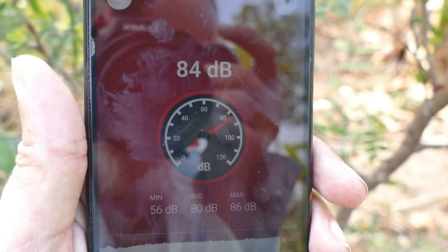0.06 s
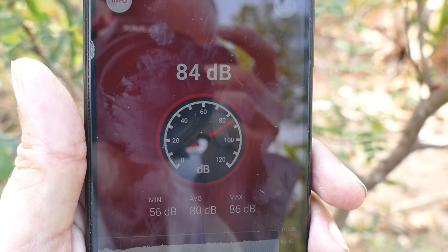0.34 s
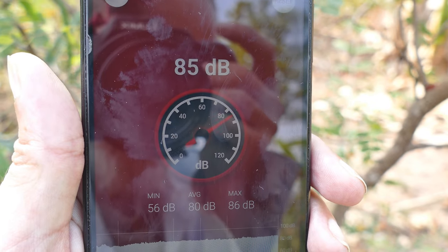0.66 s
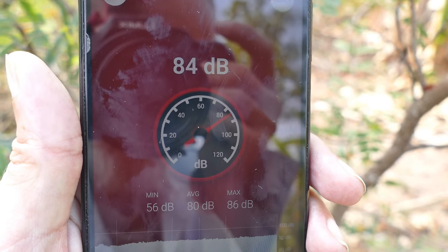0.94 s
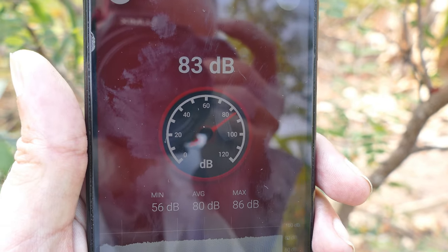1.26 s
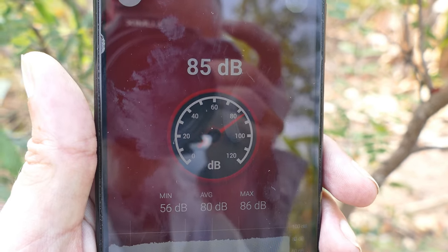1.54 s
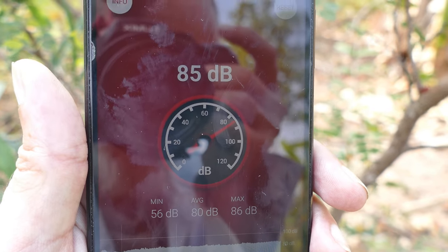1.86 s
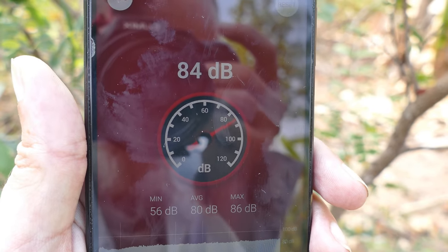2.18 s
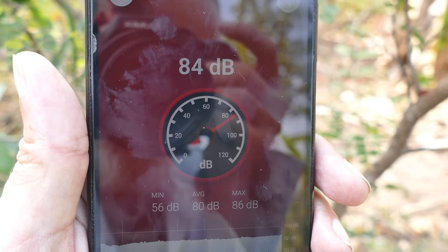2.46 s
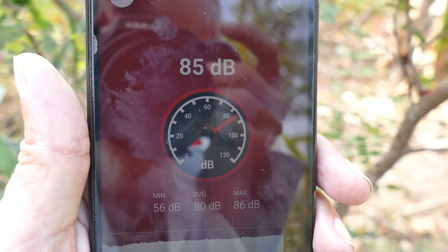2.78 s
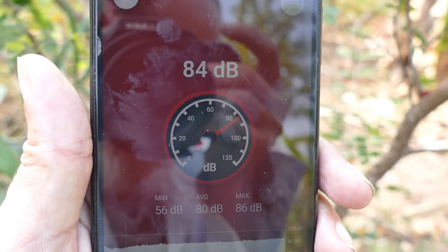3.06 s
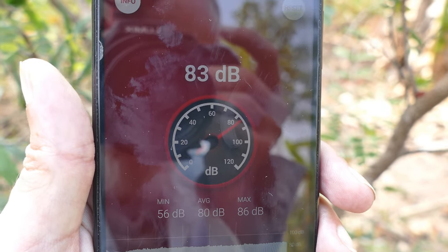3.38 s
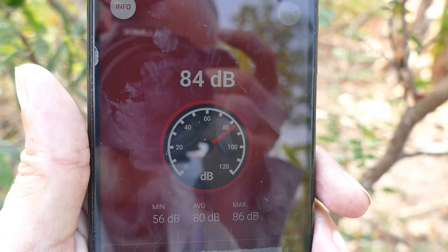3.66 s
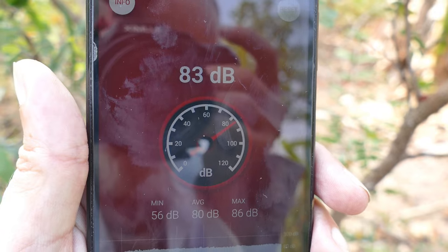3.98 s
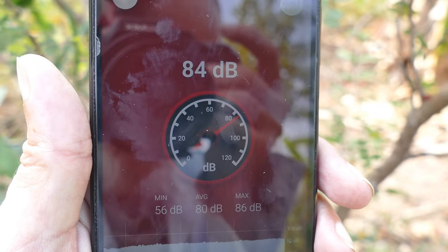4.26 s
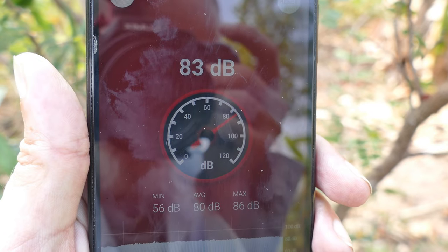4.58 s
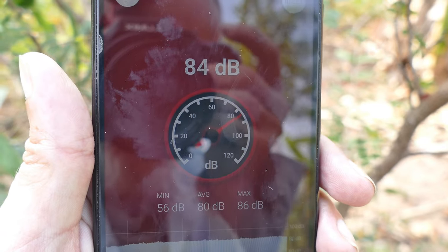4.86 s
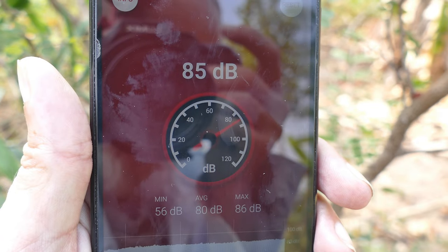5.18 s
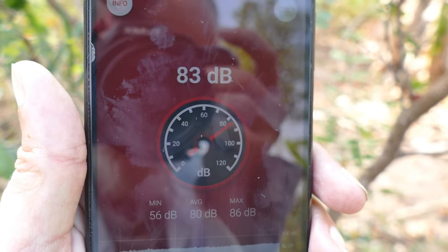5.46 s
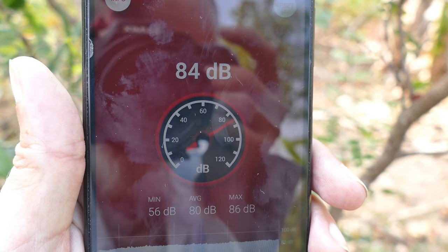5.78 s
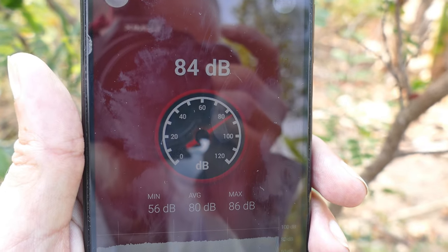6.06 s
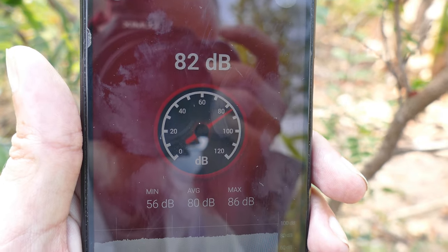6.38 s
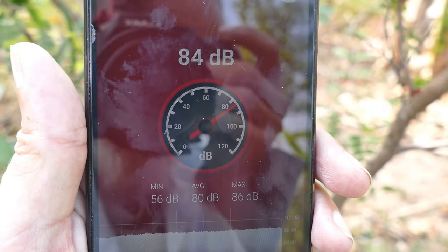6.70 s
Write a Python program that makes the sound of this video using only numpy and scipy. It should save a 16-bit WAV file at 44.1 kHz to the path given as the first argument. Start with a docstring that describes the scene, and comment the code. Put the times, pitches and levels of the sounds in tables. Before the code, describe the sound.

A loud nearby cicada rasps rhythmically, then settles into a steady fluttering buzz over a shimmering distant chorus.

```python
"""A near cicada sings a loud, reedy tone, bent by its tymbal clicks and chopped by its belly about 39
times a second. At first it keeps breaking into short bright rasps, then it settles into a steady flutter.
A second cicada pulses high and thin and fades. Behind them: a shimmering far chorus, a little wind on
the microphone and a faint noise floor."""
import sys
import numpy as np
from scipy import signal
from scipy.fft import rfft, irfft
from scipy.io import wavfile
from scipy.ndimage import uniform_filter1d

SR = 44100
rng = np.random.default_rng(int(sys.argv[2]) if len(sys.argv) > 2 else 0)


def wrap_up_sound(samples):
    """Save the sound to the file named by the first command line argument, as 16-bit audio."""
    columns = np.atleast_2d(samples).T
    # keep every value between -1 and 1, then stretch to whole-number steps
    tamed = np.clip(columns, -1, 1)
    steps = np.round(tamed * 32767).astype(np.int16)
    wavfile.write(sys.argv[1], SR, steps)


N = 305613
TIME_S = np.arange(N) / SR


# song partials: (harmonic number, relative level [dB], loss in a rasp [dB])
SONG_PARTIALS = [(1, -13.5, 4), (2, 2, 10.5), (3, -5.5, 3), (4, -17.5, -6.5), (5, -42, 3)]
# echoes off nearby surfaces: (delay [ms], gain [dB])
SONG_REFLECTIONS = [(1.173, -20.5), (5.801, -16)]
# response of hollow belly and wings: (frequency [Hz], relative gain [dB])
BELLY_RESPONSE = [(1100, -7), (1400, 2), (1730, -2), (2250, 0), (2650, 2), (2900, 0), (3250, 2.5),
                  (3700, 3), (4000, 4), (4280, 3), (4560, 0), (5150, 4), (5550, -1.5), (5880, 6),
                  (6200, 4.5), (7000, -4.5), (10000, -26)]

def song(slack, pitch_hz=1725.8, db=-17, glide=.2, choke_lift=.05, sag_db=11, choke_db=12):
    """The belly rings like a reed; each click drops the pitch, which climbs back, higher when choked."""
    choked = flutter()
    cycle = tymbal(click_hz=213.8, jitter=.17)
    tension = uniform_filter1d(cycle, size=24)
    bend = glide * (tension - .5) + choke_lift * choked
    wobble = .01459 * walk(700) + .018 * walk(107.3) + .00398 * walk(10.99)
    phase = 2 * np.pi * np.cumsum(pitch_hz * (1 + bend + wobble)) / SR
    tone = sum(np.sin(harmonic * phase) * undb(partial_db - loss_db * slack + .49 * walk(600))
               for harmonic, partial_db, loss_db in SONG_PARTIALS)
    # each rib snap collapses the ring by a random depth
    collapse = uniform_filter1d(np.exp(-cycle / .089), size=16) * np.abs(walk(280))
    tone = tone * undb(-sag_db * collapse - choke_db * choked + .67 * walk(230))
    # the gliding pitch beats against its echoes
    tone = tone + sum(undb(echo_db) * delay(tone, ms) for ms, echo_db in SONG_REFLECTIONS)
    # upper resonance, strong while the belly is taut
    wing = level(ring(tone, hz=4286, width_hz=330), db=-14) * undb(-14 * slack)
    return (colour(tone, BELLY_RESPONSE) + wing) * undb(db)


def flutter(beat_hz=39.184, slowing_hz_per_s=.4, settle_s=2.59, close_beats=.08, reopen_beats=.15):
    """The belly chokes the song (0-1) at each beat's end, in random stumbles and after each rasp."""
    since_s = TIME_S - settle_s
    beats = beat_hz * since_s - slowing_hz_per_s * since_s ** 2 / 2 + .035 * walk(20)
    cycle = beats % 1
    gap_beats = .05 + .115 * np.sqrt(np.maximum(since_s, 0))
    gap_beats *= np.exp(.25 * rng.standard_normal(size=400)[np.floor(beats).astype(int)])  # per beat
    closing = (cycle - 1 + gap_beats) / close_beats + .9
    reopening = (1 - cycle) / reopen_beats
    gap = np.clip(np.minimum(closing, reopening), 0, 1)
    stumble = np.clip(2 * (walk(169) - 2.1), 0, 1)
    pause = sum(gain * bump(time_s + .02164, width_s=.005) for time_s, gain, _ in rasp_events())
    return uniform_filter1d(np.minimum(gap + stumble + pause, 1), size=24)


def tymbal(click_hz, jitter):
    """Ribs buckle in quick, uneven succession: position in the click cycle (0-1)."""
    return np.cumsum(click_hz * (1 + jitter * walk(80) + .015 * walk(1.8))) / SR % 1


# rasp spectrum: (frequency [Hz], relative level [dB])
RASP_SPECTRUM = [(1200, -36), (2000, -13.5), (2500, -22.5), (3300, 5), (4200, -11), (5200, 5.5),
                 (6000, -19), (6800, -5.5), (7600, -14.5), (8300, -7.5), (9400, -21.5), (11000, -19),
                 (14500, -15.5), (15600, -24)]

def rasp(envelope, db=-21, decay_cycles=.94):
    """With the belly slack the ribs snap faster and drier: one bright burst per click."""
    bursts = noise() * np.exp(-tymbal(click_hz=280.6, jitter=.055) / decay_cycles)
    return colour(bursts, RASP_SPECTRUM) * envelope * undb(db)


# rasping bouts: (start [s], end [s], rasp width at full vigour [s])
RASP_BOUTS = [(-.707, .866, .033), (1, 2.787, .041)]

def rasp_events(stride_s=.1638, warm_up_s=.5317, wind_down_s=.2402, tire_s=.14):
    """A bout starts eagerly, finds its stride, hurries and tires: (time [s], gain, width [s])."""
    events = []
    for start_s, end_s, width_s in RASP_BOUTS:
        time_s = start_s
        while time_s < end_s:
            vigour = 1 - np.exp((time_s - end_s) / tire_s)
            events.append((time_s, vigour, width_s * np.sqrt(vigour)))
            eager_s = .0374 * np.exp((start_s - time_s) / warm_up_s)
            hurry_s = .086 * np.exp((time_s - end_s) / wind_down_s)
            time_s += max(stride_s - eager_s - hurry_s, stride_s / 2)
    return events


# high cicada spectrum: (frequency [Hz], relative level [dB])
HIGH_SPECTRUM = [(4000, -40), (6500, 3.5), (9500, -9.5), (10800, 0), (11400, -10), (12000, 1), (13000, 2.5),
                 (13500, -4), (14300, -4.5), (15500, -13)]

def high_cicada(trim_db=-1, swell_s=.0528, push_s=.0275, push_lag_s=.034, push_db=-7):
    """A thin tymbal sizzle swells 6-8 times a second, each swell with a softer after-push."""
    envelope = sum(undb(db) * (bump(time_s, swell_s) + undb(push_db) * bump(time_s + push_lag_s, push_s))
                   for time_s, db in swell_events())
    sizzle = noise() * np.exp(-tymbal(click_hz=293, jitter=.055))
    return colour(sizzle, HIGH_SPECTRUM) * envelope * undb(trim_db)


# high cicada effort: (time [s], swell spacing [s], relative level [dB])
SWELL_EFFORT = [(.4, .1666, -35.5), (1, 0.13, -36), (1.2, 0.1395, -31.5), (1.5, 0.1496, -33.5),
                (3.45, 0.1684, -35), (4.35, .1276, -38), (4.55, 0.13, -47)]

def swell_events(first_s=.041):
    """Effort paces the swells, up to its last point: (time [s], relative level [dB])."""
    times_s, spacings_s, levels_db = np.transpose(SWELL_EFFORT)
    events, time_s = [], first_s
    while time_s < times_s[-1]:
        events.append((time_s, np.interp(time_s, times_s, levels_db)))
        time_s += np.interp(time_s, times_s, spacings_s)
    return events


# far chorus spectrum: (frequency [Hz], relative level [dB])
CHORUS_SPECTRUM = [(1150, -32), (1400, -10), (1720, 1.5), (2250, -12.5), (2900, -4), (3450, -23),
                   (4500, -0.5), (5200, -20), (6300, -11.5), (7000, -9), (8200, -14.5), (9500, -16.5),
                   (12800, -16), (15500, -29.5)]

def chorus(db=-35.5, grain_db=2, shimmer_db=.59):
    """Many distant cicadas melt into a shimmering hiss."""
    hiss = noise() * undb(grain_db * walk(280) + shimmer_db * walk(30))
    return colour(hiss, CHORUS_SPECTRUM) * undb(db)


# gusts: (time [s], level [dB], width [s])
WIND_GUSTS = [(.8, -30.5, 0.21), (1.1, -43.5, 0.38), (6.6, -41.5, 0.77)]
# wind spectrum: (frequency [Hz], relative level [dB])
WIND_SPECTRUM = [(7, 14), (11, 17), (17, 8.5), (25, 4), (40, -8), (62, -13), (100, -23), (150, -35),
                 (300, -54)]

def wind(breeze_db=-42.5, waver_db=2):
    """A wavering breeze and a few gusts buffet the microphone."""
    breeze = undb(breeze_db + waver_db * walk(2.4))
    gusts = sum(undb(db) * bump(time_s, width_s) for time_s, db, width_s in WIND_GUSTS)
    return colour(noise(), WIND_SPECTRUM) * (breeze + gusts)


# stereo hiss spectrum: (frequency [Hz], relative level [dB])
STEREO_HISS_SPECTRUM = [(680, -69), (1150, -42), (1350, -16), (1680, -2), (2120, -14.5), (3520, 1),
                        (5230, -1), (9350, -20.5), (12500, -18), (15000, -29)]

def stereo_hiss(db=-44):
    """A faint steady high hiss, heard as width."""
    return undb(db) * colour(noise(), STEREO_HISS_SPECTRUM)


# noise floor spectrum: (frequency [Hz], relative level [dB])
FLOOR_SPECTRUM = [(100, -4), (200, 3.5), (350, 0.5), (650, -0.5), (900, 1.5), (1150, 2.5)]

def noise_floor(slack, db=-61.5, flicker_db=2.2, dip_db=4):
    """A faint, flickering low noise floor that dips under each rasp."""
    return colour(noise() * undb(flicker_db * walk(40)), FLOOR_SPECTRUM) * undb(db - dip_db * slack)


def scatter(x, t60_s):
    """Many weak reflections off twigs and trunks."""
    tail = noise()[:SR // 2] * undb(-60 * TIME_S[:SR // 2] / t60_s)
    return signal.fftconvolve(x, tail / np.linalg.norm(tail))[:N]


def undb(db):
    """Decibels to gain."""
    return 10 ** (np.asarray(db) / 20)


def level(x, db=0):
    """Scale to an rms level."""
    return x * undb(db) / np.sqrt(np.mean(x ** 2))


def noise():
    """White noise."""
    return rng.standard_normal(N)


def walk(rate_hz):
    """Smooth random drift, rms 1."""
    lowpass = np.exp(-(np.fft.rfftfreq(N, 1 / SR) / rate_hz) ** 2)
    return level(irfft(rfft(noise()) * lowpass, N))


def colour(x, spectrum):
    """Filter by a spectrum, falling 20 dB/octave past its ends; output rms 1."""
    hz, db = np.transpose(spectrum)
    octave, knots = np.log2(np.fft.rfftfreq(N, 1 / SR) + 1), np.log2(hz)
    octaves_outside = np.abs(octave - np.clip(octave, knots[0], knots[-1]))
    gain = undb(np.interp(octave, knots, db) - 20 * octaves_outside)
    return level(irfft(rfft(x) * gain, N))


def ring(x, hz, width_hz):
    """Steep resonance: two band-passes in series."""
    b, a = signal.iirpeak(hz, hz / width_hz, fs=SR)
    return signal.lfilter(b, a, signal.lfilter(b, a, x))


def delay(x, ms):
    """Circular fractional delay."""
    return irfft(rfft(x) * np.exp(-2j * np.pi * np.fft.rfftfreq(N, 1 / SR) * ms / 1000), N)


def bump(time_s, width_s, flatness=2):
    """Bell-shaped envelope, width_s wide at half height."""
    return 2 ** -np.minimum(np.abs(2 * (TIME_S - time_s) / width_s), 4) ** flatness


def scene(song_echo_db=-18, bright_echo_db=-6):
    """Callers and their echoes sit at the centre; weak independent noise layers add width."""
    events = rasp_events()
    rasping = sum(gain * bump(time_s, width_s) for time_s, gain, width_s in events)
    # the belly lets go for the whole rasp
    slack = sum(gain * bump(time_s - .002, 1.08 * width_s, flatness=4.1)
                for time_s, gain, width_s in events)
    near = song(slack)
    bright = rasp(rasping) + high_cicada() + chorus()
    song_echo = undb(song_echo_db) * scatter(near, t60_s=.13)
    bright_echo = undb(bright_echo_db) * scatter(bright, t60_s=.054)
    mid = near + bright + song_echo + bright_echo + noise_floor(slack) + wind()
    diffuse = undb(-18) * (rasp(rasping) + high_cicada()) + stereo_hiss()
    side = diffuse + undb(-23) * noise_floor(slack) + undb(-19) * wind()
    return np.array([mid + side, mid - side])


def record(dry, cutoff_hz=15700):
    """A steep low-pass cuts the top."""
    return signal.sosfiltfilt(signal.ellip(10, .1, 70, cutoff_hz, fs=SR, output="sos"), dry)


dry = scene()
out = record(dry)
wrap_up_sound(out)
```